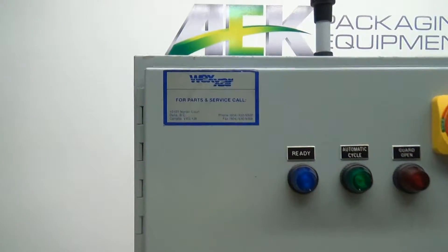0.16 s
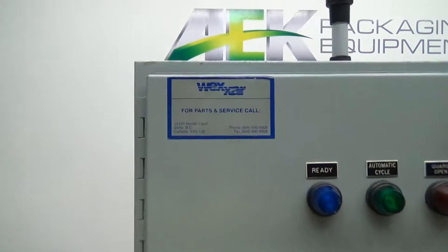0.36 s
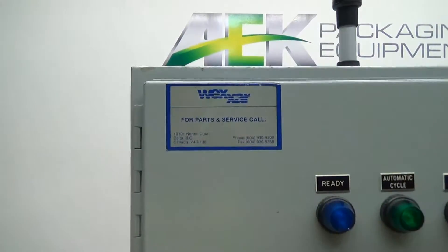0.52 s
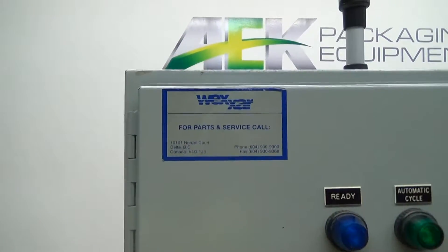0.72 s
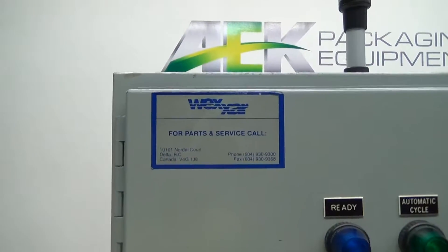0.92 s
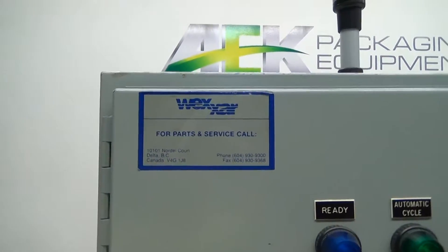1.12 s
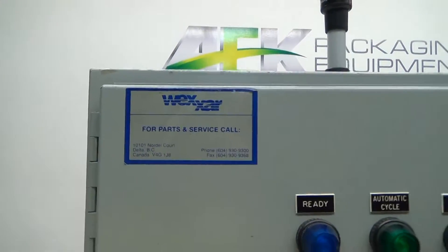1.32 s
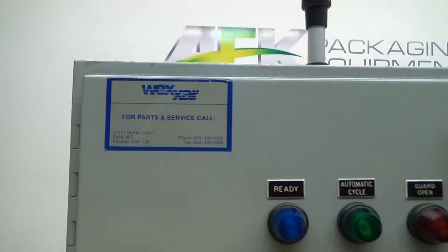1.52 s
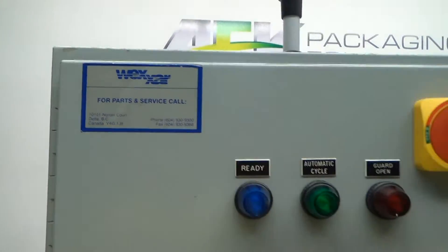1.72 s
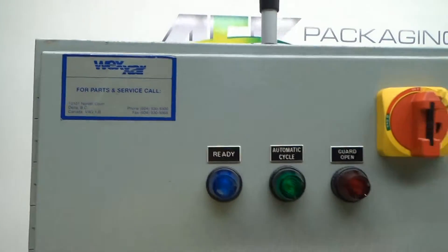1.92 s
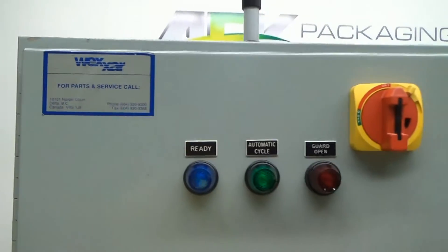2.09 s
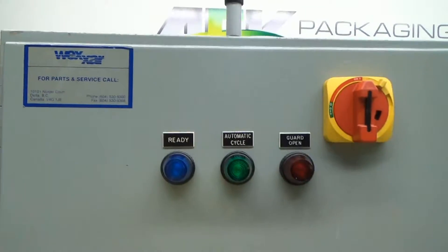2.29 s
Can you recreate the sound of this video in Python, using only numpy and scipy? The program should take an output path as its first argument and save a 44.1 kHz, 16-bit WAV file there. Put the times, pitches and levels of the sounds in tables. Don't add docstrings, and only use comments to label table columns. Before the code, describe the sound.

The tail of an earlier slam fades, then two sharp metal clunks with loose rattle and small air puffs ring through an industrial hall, heard from a few metres, over quiet hiss and rapid chugging.

```python
import sys
import numpy as np
from scipy import signal
from scipy.fft import rfft, irfft, next_fast_len
from scipy.io import wavfile
from scipy.ndimage import uniform_filter1d

SR = 44100
rng = np.random.default_rng(int(sys.argv[2]) if len(sys.argv) > 2 else 0)


def volts(x):
    e = np.asarray(x, float) / 20
    return 10 ** e


def unload_audio(sound):
    columns = np.transpose(np.atleast_2d(sound))
    steps = np.round(np.clip(columns, -1, 1) * 32767)
    wavfile.write(sys.argv[1], SR, steps.astype(np.int16))


N = 103635
PAD = SR // 2


def unit(x):
    return x / np.sqrt(np.mean(x ** 2) + 1e-20)


def along(points, hz):
    f, v = np.transpose(points)
    return np.interp(np.log(hz + 1), np.log(f + 1), v)


def filtered(x, response):
    n = x.shape[-1]
    m = next_fast_len(n + 8192)
    return irfft(rfft(x, m) * response(np.fft.rfftfreq(m, 1 / SR)), m)[..., :n]


def level_filtered(x, response):
    band_hz = np.linspace(1, SR / 2, 4096)
    return filtered(x, response) / np.sqrt(np.mean(abs(response(band_hz)) ** 2))


def dull(x, corner_hz):
    return filtered(x, lambda f: 1 / (1 + 1j * f / corner_hz) ** 2)


def pan(db):
    return volts([[db / 2], [-db / 2]])


def spread(pair, alike):
    def mid_side_gains(hz):
        angle = np.arccos(np.clip(along(alike, hz), -1, 1)) / 2
        return np.array([np.cos(angle), np.sin(angle)])

    mid, side = filtered(pair, mid_side_gains)
    return np.array([mid + side, mid - side])


def resonance(f, hz, width_hz):
    return 1j * f * width_hz / (hz * hz - f * f + 1j * f * width_hz)


def burst(t, rise_s, hold_s, t60_s):
    return np.clip(t / rise_s + 1, 0, 1) ** 2 * volts(-60 * np.clip(t - hold_s, 0, None) / t60_s)


def during(rows, start_s, end_s):
    return [row for row in rows if start_s - .1 < row[0] < end_s - .1]


# (time [s], level [dB])
TICKS = [
    (0.266, -33),
    (0.318, -35),
    (.394, -46),
    (0.643, -37),
    (.700, -25.5),
    (.752, -36),
]


def light_contacts(clock, start_s, end_s, db):
    lead_s, touch_db = 0.023, -14
    touch = volts(db + touch_db) * burst(clock - start_s + lead_s, 0.00085, 0.019, 0.055)
    ticks = sum(volts(level) * burst(clock - at, .001, .003, .02) for at, level in during(TICKS, start_s, end_s))
    return touch + ticks


def rattle_grit(n):
    rate_hz, spread_db = 1200, 2.5
    hits = rng.random(n) < rate_hz / SR
    contacts = hits * volts(spread_db * rng.standard_normal(n))
    return unit(signal.lfilter([1], [1, -.99], contacts) * rng.standard_normal(n))


# (frequency [Hz], width [Hz], level [dB])
STEEL = [(504, 48, 0.5), (763, 108, 9.5), (935, 64, 1.5), (1107, 28, 8.5), (1640, 175, -5), (1985, 40, 7),
         (2660, 130, -18), (2790, 93, 7), (4310, 56, -9)]
# (frequency [Hz], density [dB per Hz])
BROAD = [(150, -31), (300, -17), (470, -18), (540, -5), (900, -7.5), (2800, -6), (8500, -18.5),
         (13000, -23.5), (14800, -47)]


def steel(f):
    rings = sum((-1) ** k * volts(db) * resonance(f, hz, width_hz) for k, (hz, width_hz, db) in enumerate(STEEL))
    return volts(along(BROAD, f)) + volts(-6) * rings


# (time [s], frequency [Hz], level [dB], t60 [s])
CLANGS = [(.2175, 2250, -28, .015), (.2185, 2700, -32, .015), (.220, 1640, -31, .04),
          (.223, 1115, -30, .025), (.223, 780, -32, .03), (.244, 530, -34, .08), (.264, 780, -31, .02),
          (.5745, 1660, -24, .07), (.576, 1950, -27, .04), (.574, 4250, -31, .02), (.582, 800, -27, .025),
          (.607, 860, -30, .04), (.605, 530, -33, .08), (.621, 760, -30, .03)]


def clangs(clock, start_s, end_s):
    rise_s, hold_s = .003, .005
    out = np.zeros(len(clock))
    for at, hz, db, t60_s in during(CLANGS, start_s, end_s):
        envelope = volts(db) * burst(clock - at - rise_s, rise_s, hold_s, t60_s)
        out += envelope * np.sin(2 * np.pi * hz * clock)
    return out


# (time [s], level [dB], rise [s], hold [s])
PUFFS = [
    (.225, -45, 0.013, 0.047),
    (.545, -52.5, 0.1, 0.038),
    (.582, -58, 0.014, 0.02),
]


def puffs(clock, start_s, end_s):
    out = np.zeros(len(clock))
    for at, db, rise_s, hold_s in during(PUFFS, start_s, end_s):
        out += volts(db) * burst(clock - at, rise_s, hold_s, 0.12)
    return out


# (frequency [Hz], density [dB per Hz])
PUFF = [(2000, -30), (5000, 0), (8000, -8.5), (12500, -7), (14500, -17), (15500, -49)]


def jet(x):
    return level_filtered(x, lambda f: volts(along(PUFF, f)))


def thud(t):
    hz, width_hz, db, peak_s = 165, 60, -54, .055
    u = np.clip(t, 0, None) / peak_s
    swing = unit(filtered(rng.standard_normal(len(t)), lambda f: resonance(f, hz, width_hz) ** 2))
    return volts(db) * (u * np.exp(1 - u)) ** 2 * swing


# (frequency [Hz], t60 [s])
HALL = [(150, 2.54), (500, 0.57), (1000, 1.07), (2700, 1.356), (5400, 1.156), (8000, 0.68), (14000, 0.88)]
# (frequency [Hz], likeness [0..1])
ALIKE = [(60, 0.95), (180, 0.97), (550, 0.8), (1650, 0.7), (4970, 0.66), (15000, 0.9)]


def hall(envelope):
    delay_s = 0.0051
    n = len(envelope)
    hz, t, z = signal.stft(rng.standard_normal((2, n)), SR, nperseg=256)
    arrival_s = np.arange(n) / SR + delay_s
    power = np.interp(t, arrival_s, uniform_filter1d(envelope ** 2, size=128), left=0)
    decay = 10 * t[1] * volts(-120 * t / along(HALL, hz)[:, None])
    held = signal.fftconvolve(power[None], decay, axes=1)[:, :len(t)]
    tail = signal.istft(z * np.sqrt(abs(held)), SR, nperseg=256)[1][:, :n]
    return spread(tail, ALIKE)


# (time [s], level [dB], rattle [dB], rattle hold [s])
SLAMS = [
    (-.14, -26.5, -17.5, 0.15),
    (0.217, -27.5, -7.5, 0.11),
    (0.5756, -21, -10.5, .06),
]


def slams():
    soft_hz, blow_hz, hall_hz = 3480, 6500, 9400
    crack_db, hall_db, puff_send_db = -2.5, -1, 3
    direct_pan_db, hall_pan_db = .7, -1
    clock = (np.arange(N + PAD) - PAD) / SR
    out = np.zeros((2, N + PAD))
    noise = lambda: rng.standard_normal(len(clock))
    ends_s = [row[0] for row in SLAMS[1:]] + [9]
    for (start_s, db, rattle_db, hold_s), end_s in zip(SLAMS, ends_s):
        t = clock - start_s
        light = light_contacts(clock, start_s, end_s, db)
        blow = volts(db) * burst(t, .004, .012, .04)
        rattle = volts(db + rattle_db) * burst(t, 0.0017, hold_s, 0.23)
        puff = puffs(clock, start_s, end_s)

        shake = volts(crack_db) * dull(blow * noise(), blow_hz)
        shake += dull(light * noise(), soft_hz)
        shake += rattle * rattle_grit(len(t))
        direct = level_filtered(shake, steel) + jet(puff * noise()) + clangs(clock, start_s, end_s)

        wet = level_filtered(dull(hall(blow + rattle + light), hall_hz), steel)
        wet += volts(puff_send_db) * jet(hall(puff))
        out += pan(direct_pan_db) * direct + pan(hall_pan_db) * volts(hall_db) * wet
        out += thud(t)
    return out[:, PAD:]


# (delay [s], frequency [Hz], level [dB], length [s])
KNOCKS = [(.002, 336, -66, .011), (.008, 155, -65, .016), (.032, 382, -54, .003), (.031, 271, -65, .007),
          (.040, 595, -58, .007), (.045, 201, -63, .011), (.061, 586, -61, .0045), (.065, 249, -57.5, .007),
          (.076, 405, -60, .011), (.075, 675, -66, .016), (.079, 176, -60.5, .011),
          (.094, 238, -53.2, .0045)]
# (frequency [Hz], density [dB per Hz])
CHUG = [(60, -30), (110, -8), (300, 0), (440, 0), (520, -12), (680, -2), (900, -10), (1300, -40)]


def compressor():
    turn_s, start_s, knock_spread_db = .11052, .0291, .8
    chug_db, mains_hz, mains_db = -68, 119.5, -73
    t = np.arange(N) / SR
    turn = (t - start_s) / turn_s
    out = np.zeros(N)
    for delay_s, hz, db, length_s in KNOCKS:
        which = np.round(turn - delay_s / turn_s)
        u = (turn - which) * turn_s - delay_s
        sizes = volts(db + knock_spread_db * rng.standard_normal(32))
        size = sizes[which.astype(int) + 2]
        out += size * np.sqrt(2) * np.exp(-(u / length_s) ** 2) * np.cos(2 * np.pi * hz * u)
    echo = np.resize(rng.standard_normal(round(turn_s * SR)), N)
    out += volts(chug_db) * unit(filtered(echo, lambda f: volts(along(CHUG, f))))
    return out + volts(mains_db) * np.sqrt(2) * np.sin(2 * np.pi * mains_hz * t)


# (frequency [Hz], density [dB per Hz])
AIR = [(450, -12.5), (800, -2), (1330, -6.5), (3600, -3), (8300, -15), (13000, -15), (14500, -22),
       (15800, -18)]
# (frequency [Hz], density [dB per Hz])
RUMBLE = [(20, -30), (50, -8), (110, -9.5), (240, 3.5), (420, -6.5), (520, 0), (650, 0), (900, -27),
          (1300, -47)]
# (frequency [Hz], likeness [0..1])
AIR_ALIKE = [(60, 1.0), (180, 0.96), (550, 0.8), (1650, 0.77), (4970, 0.56), (15000, 1)]


def air():
    air_db, rumble_db, air_pan_db = -55.5, -66, -.6

    def rush(points):
        noise = rng.standard_normal((2, N))
        return unit(spread(filtered(noise, lambda f: volts(along(points, f))), AIR_ALIKE))

    return pan(air_pan_db) * volts(air_db) * rush(AIR) + volts(rumble_db) * rush(RUMBLE)


def scene():
    return slams() + compressor() + air()


def roll_off(x):
    return signal.sosfilt(signal.butter(12, 15900, fs=SR, output="sos"), x)


def record(dry):
    whine_hz, whine_db, low_cut_hz, top_hz = 15734, -79, 38, 15820
    whine = volts(whine_db) * np.sqrt(2) * np.sin(2 * np.pi * whine_hz * np.arange(N) / SR)
    band = lambda f: (f < top_hz) * f ** 4 / (f ** 4 + low_cut_hz ** 4)
    return roll_off(filtered(dry + whine, band))


dry = scene()
out = record(dry)
unload_audio(out)
```